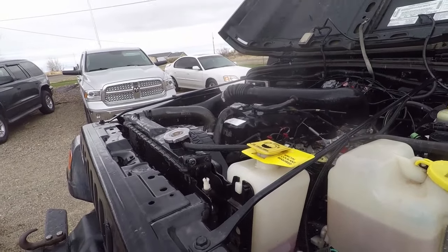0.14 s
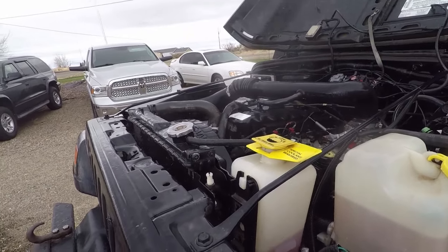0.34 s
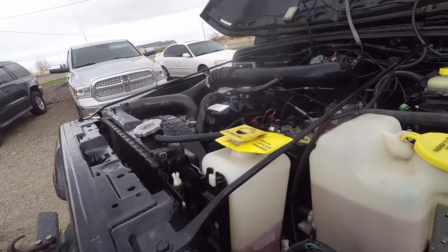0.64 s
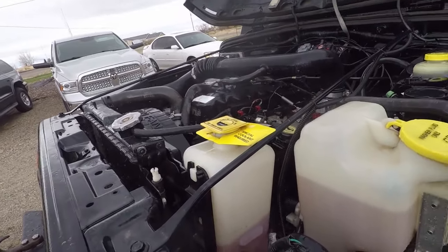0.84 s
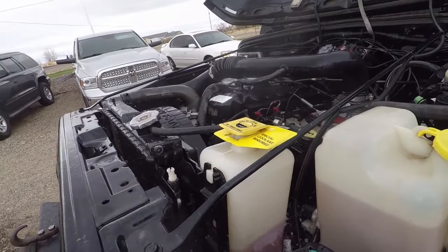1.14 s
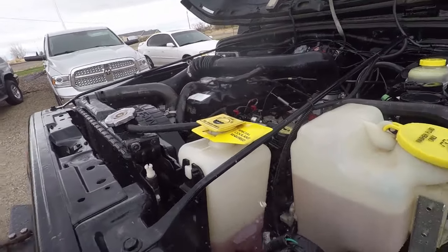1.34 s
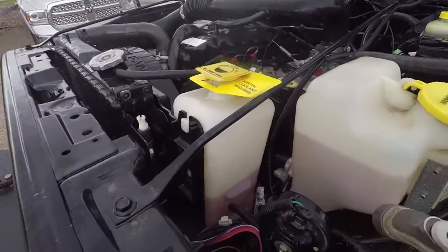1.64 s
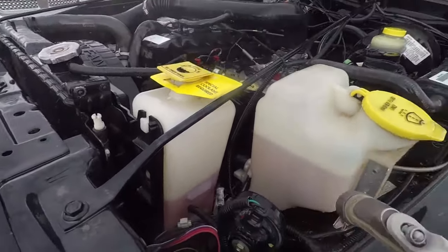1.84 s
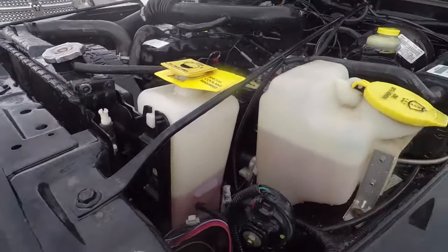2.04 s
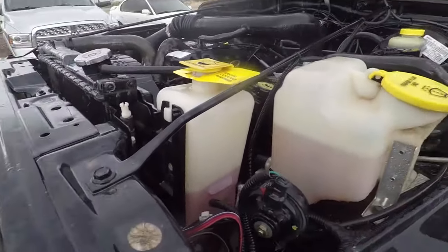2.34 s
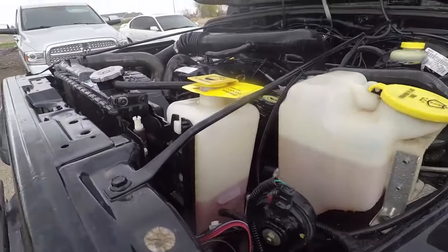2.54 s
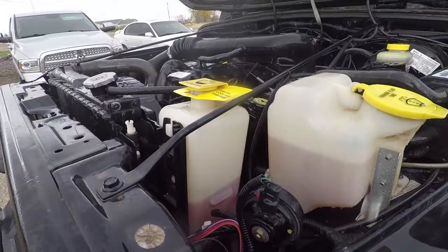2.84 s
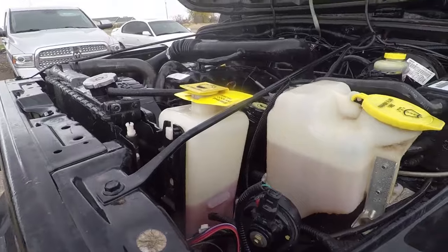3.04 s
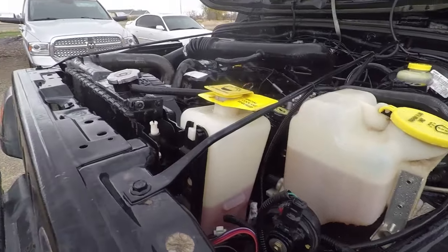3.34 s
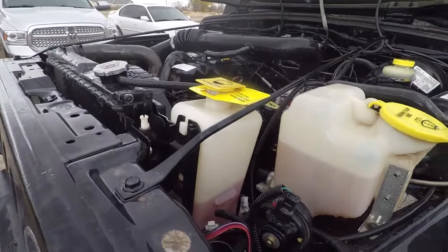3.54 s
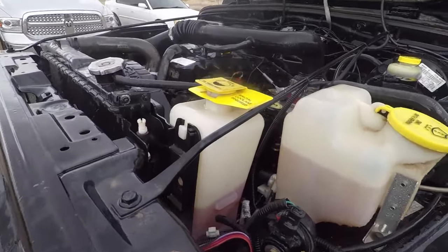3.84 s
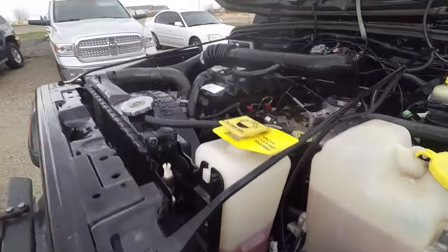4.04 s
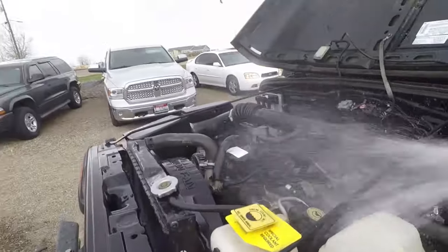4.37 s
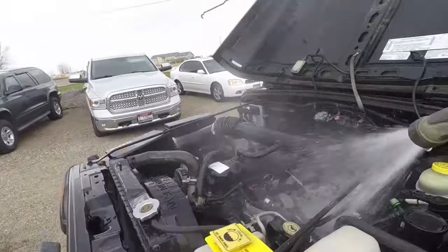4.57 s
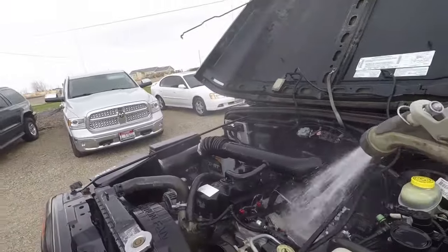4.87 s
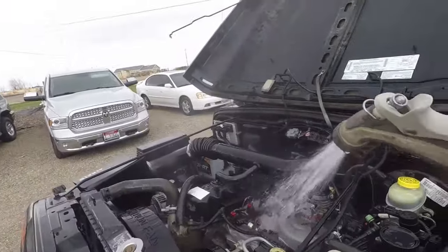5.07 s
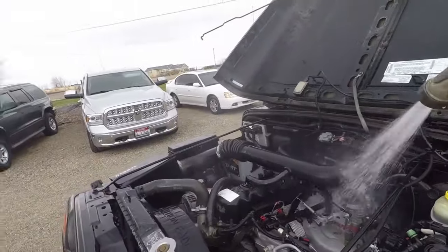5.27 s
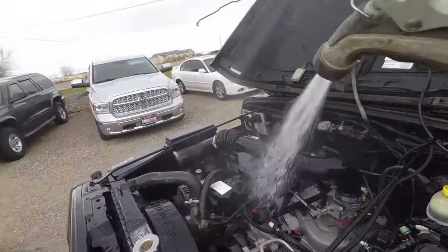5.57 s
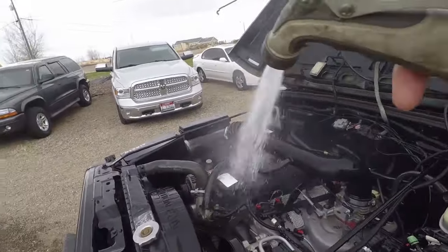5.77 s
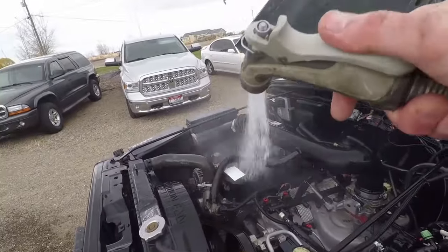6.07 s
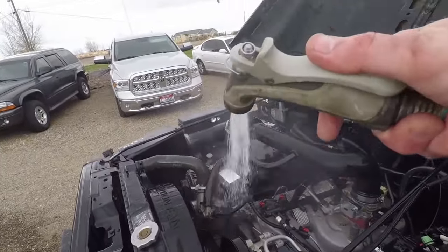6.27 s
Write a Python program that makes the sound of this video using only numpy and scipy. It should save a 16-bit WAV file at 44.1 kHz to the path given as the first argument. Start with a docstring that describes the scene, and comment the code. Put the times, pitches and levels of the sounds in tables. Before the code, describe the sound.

A hose jet hisses and drums inside an engine bay, snaps off to trickles, drips and wind thumps, then blasts back brighter and closer.

```python
"""A hose nozzle rinses an engine bay outdoors, is shut for nearly three seconds, then opens again close by.
The jet is noise and droplet impacts: it hisses, spatters, drums on panels and rings resonant hollows.
In the pause water trickles and drips off the engine, shaped noise bursts over a faint open-air background.
Wind rumbles, flutters and thumps in both microphone ports of a hand-held camera.
The stereo image soon narrows to mono, except for the sound above about 12 kHz."""
import sys
import numpy as np
from scipy import signal
from scipy.fft import rfft, irfft
from scipy.io import wavfile

SR = 44100
rng = np.random.default_rng(int(sys.argv[2]) if len(sys.argv) > 2 else 0)


def store_pcm(level_fs):
    """Save levels as 16-bit WAV."""
    pcm = np.round(np.clip(level_fs, -1, 1) * 32767).astype(np.int16)
    wavfile.write(sys.argv[1], SR, np.atleast_2d(pcm).T)


N = 282681
TIME = np.arange(N) / SR


def jet():
    """The valve lets both rinses through."""
    first, second = valve()
    return first * first_rinse() + second * second_rinse()


# the trigger is let go, later eased to a leak, then squeezed fully
SHUT_S, EASED_S, SQUEEZED_S = 1.313, 4.027, 4.086
CLOSING_S, OPENING_S, LEAK_SHARE = 0.0095, 0.002, 0.33  # time constants, largest leak


def valve():
    """Opening 0-1 for each rinse: the first snaps shut; the second leaks more and more, then opens fully."""
    first = 1 - rise(SHUT_S, CLOSING_S)
    leak = LEAK_SHARE * np.clip((TIME - EASED_S) / (SQUEEZED_S - EASED_S), 0, 1)
    second = leak + (1 - leak) * rise(SQUEEZED_S, OPENING_S)
    return first, second


# spray colour down behind the tanks, relative: pitch_hz, level_db (per Hz)
HIDDEN_HISS = [(250, -10), (600, -10), (1500, -13), (3000, -13.5), (4100, -15), (5300, -8), (7000, -5),
               (9400, -0.5), (10700, -2.5), (11800, -10), (13500, -12.5), (15300, -23.5)]
# loudness of the spray as the nozzle moves nearer or is shielded: time_s, level_db
HIDDEN_SPRAY = [(0, -23.5), (.16, -22), (.4, -25), (.95, -19), (1.06, -17.5), (1.17, -21.5), (1.3, -18.5)]
# the jet sweeps across a hollow behind the tanks:
# centre_s, half_length_s, level_db, hollow_pitch_hz, ring_db (over the panel)
HIDDEN_SWEEPS = [(0.33, 0.099, -31, 1586, -2), (0.378, .05, -39.5, 1325, 1), (0.489, 0.051, -32, 1530, 0.5),
                 (.58, 0.11, -30, 1640, -5), (1.082, .014, -34, 1610, 7), (1.122, 0.018, -32, 1666, 7),
                 (1.285, .037, -30.5, 1700, -10)]
HIDDEN_DRUM_DB, HIDDEN_HOLLOW_WIDTH_HZ = -31.5, 68


def first_rinse():
    """A smooth rinse deep in the bay, drumming harder at each panel and ringing the hollow behind it."""
    spray = hiss(HIDDEN_HISS, drop_rate=6000, spread_db=1.5, mist_db=-0.5, flutter_db=0.67)
    spray = undb(curves(HIDDEN_SPRAY)[0]) * spray
    steady = undb(HIDDEN_DRUM_DB) * rise(-0.14, 0.13)
    power = steady ** 2
    blows = impacts(2500, 1.5)
    hollows = np.zeros(N)
    for centre_s, half_s, db, hz, ring_db in HIDDEN_SWEEPS:
        power += swell(centre_s, half_s, db) ** 2
        ring = unit(resonate(blows, hz, HIDDEN_HOLLOW_WIDTH_HZ))
        hollows += swell(centre_s, half_s, db + ring_db) * ring
    drum = np.sqrt(power) * drumming(ring_db=7.5, flutter_db=1.64, bubble_db=-10)
    return spray + drum + hollows


# spray colour close by in the open, relative: pitch_hz, level_db (per Hz)
OPEN_HISS = [(250, -14.5), (600, -11.5), (1500, -16.5), (3400, -13.5), (4250, -10), (4650, -7), (7000, -3),
             (8100, 3), (10000, 2.5), (11700, -5), (13500, -9), (15300, -20.5)]
# loudness of the spray as the nozzle moves nearer or is shielded: time_s, level_db
OPEN_SPRAY = [(4.09, -19.5), (4.16, -22), (4.26, -18), (4.44, -28), (4.83, -28), (4.92, -23.5), (5.15, -25),
              (5.75, -25), (5.95, -23.5), (6.17, -25), (6.32, -19.5), (6.41, -27)]
# colour of the sizzle at the nozzle: pitch_hz, level_db (over the spray)
SIZZLE = [(3000, -5.5), (5000, -12), (6600, -0.5), (8500, -2), (11000, -7.5), (15000, 3)]
# resonances of the nozzle, heard until the water lands: pitch_hz, width_hz, level_db (over its sizzle)
NOZZLE_MODES = [(2550, 200, 2), (4900, 500, 2), (6040, 170, 5), (7200, 400, -1), (8250, 380, 4),
                (9400, 400, 3), (10550, 300, 6), (11900, 250, 5)]
# level of the low treble of the splash: time_s, level_db
SPLASH_LOW_TREBLE = [(4.12, 3), (4.25, 2.5), (4.45, 1), (4.9, 1), (5.06, 5.5), (5.3, -1), (5.5, 1.5),
                     (5.72, -0.5), (5.93, -1.5), (6.25, 0)]
# the jet sweeps across a hollow in the open:
# centre_s, half_length_s, level_db, hollow_pitch_hz, ring_db (over the panels)
OPEN_SWEEPS = [(4.15, 0.034, -24.5, 2110, 11), (4.231, 0.054, -25.5, 2030, 15),
               (4.293, 0.039, -25.5, 1990, 17), (4.371, 0.063, -27.5, 1580, -8),
               (4.702, 0.057, -37, 2130, 1), (4.956, 0.02, -36, 1600, -1), (5.0, 0.062, -27.5, 1300, -5),
               (5.065, .04, -25.5, 2480, 5), (5.135, 0.028, -31, 2480, 5), (5.191, 0.031, -28, 1670, 3),
               (5.447, 0.023, -23, 1620, -1), (5.527, 0.074, -27.5, 1680, -6),
               (6.251, 0.032, -32.5, 2430, 14)]
LOW_TREBLE_HZ, LOW_TREBLE_WIDTH_HZ, HOLLOW_WIDTH_HZ = 4080, 2600, 310
# the second jet needs a moment to reach the engine
FLIGHT_S, LANDING_S = 0.021, 0.033
# the drumming thins out as the jet is turned down onto the engine block
OPEN_DRUM_DB, DRUM_FADE_DB_PER_S = -34.5, -2.5


def second_rinse():
    """The nozzle sizzles and whistles, then the landing water hisses, drums and rings each hollow it sweeps."""
    landed = rise(SQUEEZED_S + FLIGHT_S, LANDING_S)
    spray = hiss(OPEN_HISS, drop_rate=3000, spread_db=3.0, mist_db=3.0, flutter_db=1.75)
    spray = spray * undb(curves(OPEN_SPRAY)[0] + 0.28 * walk(15))

    sizzle = colour(spray, SIZZLE)
    whistle = sum(undb(db) * resonate(sizzle, hz, width) for hz, width, db in NOZZLE_MODES)
    at_nozzle = sizzle + whistle

    extra_treble = undb(curves(SPLASH_LOW_TREBLE)[0]) - 1
    splash = spray + extra_treble * resonate(spray, LOW_TREBLE_HZ, LOW_TREBLE_WIDTH_HZ)

    block = drumming(ring_db=-10, flutter_db=1.0, bubble_db=-10.5)
    block = unit(block + 0.35 * resonate(block, 1660, 700))
    drum = undb(OPEN_DRUM_DB + DRUM_FADE_DB_PER_S * (TIME - SQUEEZED_S)) * block
    panels = covers()
    for centre_s, half_s, db, hz, ring_db in OPEN_SWEEPS:
        blows = np.roll(panels, rng.integers(N))  # other drops at each sweep
        ring = undb(ring_db) * resonate(blows, hz, HOLLOW_WIDTH_HZ)
        drum += swell(centre_s, half_s, db) * unit(blows + ring)
    return (1 - landed) * at_nozzle + landed * (splash + drum)


# as the jet wanders, narrow bands of the splash swell and fade on their own
SHIMMER_SHARE, SHIMMER_PER_S = 0.17, 26


def hiss(points, drop_rate, spread_db, mist_db, flutter_db):
    """Mist and droplets flutter together as the jet breaks into slugs; the splash keeps changing colour."""
    spray = impacts(drop_rate, spread_db) + undb(mist_db) * rng.standard_normal(N)
    spray = spray * undb(flutter_db * walk(420) + 0.45 * walk(55))
    shimmer = np.zeros(N)
    for hz in range(2800, 12000, 420):
        shimmer += walk(SHIMMER_PER_S) * resonate(spray, hz, 380)
    return unit(colour(spray + SHIMMER_SHARE * shimmer, points))


# panels under the jet, relative: pitch_hz, level_db (per Hz)
PANELS = [(150, -7.5), (400, -4.5), (650, 0.5), (850, -1.5), (1100, -2.5), (1700, -1), (2400, 1),
          (3000, -4), (4000, -13.5), (8000, -36)]
# hollows of the engine bay: pitch_hz, width_hz, level_db (over the panels, before ring_db)
BAY_MODES = [(751, 34, -8), (1010, 25, -11), (1150, 25, -15), (1325, 36, -7), (1618, 146, 0.5),
             (1825, 120, -6.5), (2470, 78, -8)]
# the hollows swell and fade on their own as the jet wanders
HOLLOW_SWING_DB, HOLLOW_SWING_PER_S = 3.5, 13


def drumming(ring_db, flutter_db, bubble_db):
    """Heavier drops beat on wet plastic and sheet metal and ring the hollows between them."""
    air = bubbles(70, 905, 2800, 10.0)
    blows = impacts(2500, 1.7) + rng.standard_normal(N) + undb(bubble_db) * air
    panels = colour(blows * undb(flutter_db * walk(170)), PANELS)
    ring = np.zeros(N)
    for hz, width, db in BAY_MODES:
        gain = undb(db + HOLLOW_SWING_DB * walk(HOLLOW_SWING_PER_S))
        ring += gain * resonate(panels, hz, width)
    return unit(panels + undb(ring_db) * ring)


# thin covers in the open give little below a kilohertz: pitch_hz, level_db
THIN_COVERS = [(300, -1.5), (820, -3.5), (1000, 5), (1750, 3), (2100, -1), (2550, 0.5), (2900, -2.5),
               (4000, 6)]
COVER_SPREAD_DB = 2.6  # scatter in the size of the drops


def covers():
    """Where the jet meets a cover, separate drops patter on it and trap small bubbles."""
    air = bubbles(160, 998, 2700, 9.8)
    blows = impacts(1500, COVER_SPREAD_DB) + 0.4 * rng.standard_normal(N) + undb(-11.5) * air
    return colour(colour(blows, PANELS), THIN_COVERS)


def bubbles(rate, low_hz, high_hz, cycles):
    """Trapped air rings for a few cycles, each bubble at the pitch of its size; about rate a second per pitch."""
    pitches = np.geomspace(low_hz, high_hz, 10)
    births = impacts(10 * rate, 2.1)
    kind = rng.integers(0, 10, N)
    return unit(sum(resonate(births * (kind == k), hz, hz / cycles) for k, hz in enumerate(pitches)))


# slugs of water that slap a panel: start_s, peak_db, pitch_hz
SLAPS = [(4.998, -16.5, 1300), (5.003, -11.5, 2490), (5.04, -14, 2300), (5.136, -18, 2310),
         (5.206, -19, 1600), (5.443, -15, 1540), (5.453, -18, 1700), (5.505, -13, 1680), (5.554, -22, 1320)]
SLAP_DECAY_S, SLAP_WIDTH_HZ = 0.0024, 900


def slaps():
    """A whole slug of water lands at once and cracks briefly on the cover."""
    out = np.zeros(N)
    for s, db, hz in SLAPS:
        crack = resonate(burst(SLAP_DECAY_S), hz, SLAP_WIDTH_HZ)
        add(out, s, colour(crack, PANELS), db)
    return out


# stray drops that hit the camera: start_s, peak_db
SPATTER = [(4.259, -7), (4.298, -9), (4.365, -9), (4.742, -12), (4.896, -10.5), (4.917, -11), (4.963, -9),
           (5.086, -9), (5.286, -9), (5.36, -13), (5.393, -8), (5.589, -12), (5.616, -9)]


def spatter():
    """Stray drops tick sharply on the camera and scatter into a little fizz."""
    out = np.zeros(N)
    for s, db in SPATTER:
        tick = burst(0.0002)
        fizz = 0.18 * burst(0.003)
        add(out, s, colour(tick + fizz, OPEN_HISS), db)
    return out


# water running off the engine: time_s, level_db
RUNOFF = [(1.35, -45), (1.5, -46), (1.85, -46.5), (1.98, -42.5), (2.3, -49), (2.6, -52), (2.95, -53.5),
          (3.3, -56.5), (3.7, -54), (4.02, -54)]
# colour of the run-off, relative: pitch_hz, level_db (per Hz)
RUNOFF_COLOUR = [(600, -6), (1500, -4.5), (2700, -5.5), (3900, -10), (5200, -4), (7000, -2.5), (9000, 2),
                 (10700, -1), (11800, -8), (13500, -13), (15000, -31)]
# soft rustles as the hose is moved: centre_s, half_length_s, level_db, pitch_hz, width_hz
RUSTLES = [(1.79, .054, -50.5, 900, 1200), (1.975, 0.077, -41, 550, 900), (2.058, .025, -40.5, 720, 300),
           (2.104, 0.027, -41.5, 800, 450), (2.182, 0.03, -45, 650, 500), (2.245, .035, -46.5, 850, 900),
           (2.803, 0.013, -48, 1500, 900), (3.507, .048, -51, 1100, 800), (3.572, .03, -44, 1080, 700),
           (3.963, 0.018, -43.5, 800, 350), (3.992, 0.021, -45.5, 1060, 400), (4.055, .014, -50, 1200, 500)]
# colour of the rubbing hose, relative: pitch_hz, level_db (per Hz)
RUSTLE_COLOUR = [(200, 14.5), (450, 6), (800, 3), (1250, -2), (1600, -8), (2500, -10), (5000, -28)]
RUNOFF_FLICKER_DB, PATTER_SHARE = 1.3, 0.52  # patter relative to the crackle


def pause():
    """With the valve shut, a fine crackle of run-off is left; noise bands swell as the hose rustles."""
    crackle = impacts(1800, 2.0) + 1.7 * rng.standard_normal(N) + 0.27 * bubbles(13, 1660, 9600, 15)
    crackle = unit(crackle * undb(RUNOFF_FLICKER_DB * walk(110))) + PATTER_SHARE * patter()
    runoff = undb(curves(RUNOFF)[0]) * unit(colour(crackle, RUNOFF_COLOUR))

    rubbing = colour(rng.standard_normal(N) * undb(2.4 * walk(97)), RUSTLE_COLOUR)
    rustle = np.zeros(N)
    for centre_s, half_s, db, hz, width in RUSTLES:
        rub = np.roll(rubbing, rng.integers(N))
        rustle += swell(centre_s, half_s, db) * unit(resonate(rub, hz, width))
    return (1 - sum(valve())) * runoff + rustle


PATTER_PER_S, PATTER_DECAY_S = 22, 0.004  # in each register


def patter():
    """Small drops splash here and there for a few milliseconds, each in its own register."""
    out = np.zeros(N)
    keep = np.exp(-1 / (PATTER_DECAY_S * SR))
    for hz in np.geomspace(2200, 12500, 7):
        splashes = signal.lfilter([1], [1, -keep], np.abs(impacts(PATTER_PER_S, 1)))
        out += splashes * resonate(rng.standard_normal(N), hz, hz / 3)
    return unit(out)


# drops falling off the engine: start_s, peak_db, pitch_hz, width (share of the pitch), decay_s
DRIPS = [(1.371, -33, 8200, .3, .005), (1.421, -37, 3070, .2, .002), (1.568, -29, 3400, 0.91, .004),
         (1.576, -32.5, 2670, .1, .005), (1.633, -35, 8600, .4, .005), (1.687, -39, 8300, .6, .003),
         (1.721, -35, 9900, .3, .004), (1.77, -26.5, 8600, 0.63, 0.0054), (1.841, -38, 9300, .3, .004),
         (1.976, -34, 3860, .27, .008), (2.258, -37, 5740, .028, .014), (2.302, -35, 9600, .2, .012),
         (2.39, -39, 1150, .25, .002), (2.41, -38, 3000, .7, .007), (2.482, -38, 7000, .32, .007),
         (2.541, -45, 1200, .25, .002), (2.592, -37, 7000, .15, .005), (2.612, -35, 10400, .25, .005),
         (2.669, -27, 8650, .35, .007), (2.743, -31.5, 7850, .35, .006), (2.812, -34, 5470, .47, .007),
         (3.236, -37, 8700, .3, .006), (3.318, -35, 7400, .37, .006), (3.601, -34.5, 1080, .23, .005),
         (3.665, -38, 8700, .23, .005)]


def drips():
    """Each falling drop is a short splash around its own pitch."""
    out = np.zeros(N)
    for s, db, hz, width, decay_s in DRIPS:
        splash = resonate(burst(decay_s), hz, width * hz)
        splash = resonate(splash, hz, 0.93 * hz)
        add(out, s, colour(splash, RUNOFF_COLOUR), db)
    return out


# knocks of the trigger and the handled camera:
# start_s, knock_peak_db, thud_peak_db, thud_pitch_hz, brightness_db (of the blow, treble), rattle_share
KNOCKS = [(1.218, -11.5, -34, 172, -9, 0.4), (1.360, -17.5, -38, 170, -4, 0.33),
          (2.8157, -18, -5, 42.7, 12, 0.047), (2.838, -29, -14, 40, 24, .1)]
# colour of blow and rattle: pitch_hz, level_db (per Hz)
KNOCK_COLOUR = [(100, 15), (350, 12.5), (700, 4), (1100, -11), (1900, -18), (2800, -42), (8000, -55)]
# a thud follows its knock and starts high, while the contact is stiff
THUD_LAG_S, THUD_STIFF_S, THUD_EXTRA_CYCLES, THUD_RING_S = 0.0021, 0.005, 0.23, 0.024


def knocks():
    """A short blow, a dull after-rattle and a few swings of a low thud that sags in pitch."""
    out, t = np.zeros(N), TIME[:SR // 5]
    for s, knock_db, thud_db, hz, bright_db, rattle in KNOCKS:
        click = 9 * (t == 0)  # a single sample
        blow = colour(click + 0.64 * burst(0.0023), [(400, 0), (1600, bright_db)])
        add(out, s, colour(blow + rattle * burst(0.021), KNOCK_COLOUR), knock_db)
        cycles = hz * t + THUD_EXTRA_CYCLES * (1 - np.exp(-t / THUD_STIFF_S))
        thud = np.sin(2 * np.pi * cycles) * np.exp(-(t / THUD_RING_S) ** 2)
        add(out, s + THUD_LAG_S, thud, thud_db)
    return out


# wind on the ports: time_s, rumble_db, flutter_db
WIND = [(0, -28.5, -20), (.55, -36, -27.5), (.62, -31, -30), (1.25, -30, -30), (1.4, -22.5, -39.5),
        (1.9, -26.5, -45), (2.15, -24.5, -33.5), (2.9, -27, -34), (4, -26.5, -36), (4.6, -28.5, -34.5),
        (5.2, -28.5, -38.5), (5.9, -34.5, -40.5), (6.41, -35, -42.5)]
# colour of the rumble, relative: pitch_hz, level_db (per Hz)
RUMBLE = [(12, -10), (25, 1), (42, 5), (60, -1), (90, -9), (200, -62.5)]
# colour of the flutter, relative: pitch_hz, level_db (per Hz)
FLUTTER = [(40, -9.5), (75, 1.5), (125, -1), (180, -11), (280, -17.5), (450, -31.5), (900, -63.5)]
# single eddies that strike the ports, each setting in half a swell early:
# time_s, peak_db, speed (relative), swell_s
EDDIES = [(.004, -14.5, 1.44, 0.0083), (.085, -19, 1.04, 0.0093), (.15, -18, 1.05, 0.01),
          (0.201, -16, 1.3, 0.0067), (0.488, -13.5, 0.52, 0.01), (.535, -13, 0.6, 0.0095),
          (2.182, -20.5, 0.57, 0.015), (2.258, -19, 1.04, .0085), (2.331, -22, 0.7, 0.0079),
          (2.416, -27, 1, 0.011), (2.569, -17, 0.99, .011), (2.664, -12, 1.08, .009),
          (2.72, -22, 1.17, 0.0052), (2.75, -17, 1.02, .0044), (2.895, -21, .8, 0.0052),
          (2.94, -15.5, 0.73, .012), (3.067, -13, 0.88, 0.011), (3.119, -19, 0.83, 0.0091),
          (3.21, -19.5, 0.62, 0.018), (3.263, -21, 0.66, 0.0086), (3.449, -14, 0.94, 0.014),
          (3.54, -19.5, 1.06, 0.0082), (3.61, -22.5, 1.42, 0.006), (3.757, -23, 0.98, .008),
          (3.803, -25.5, 1.02, .006), (3.836, -16.5, 1.1, 0.0096), (3.922, -24.5, 1.4, 0.0046),
          (4.087, -23.5, 1.46, 0.0089), (4.164, -16.5, 0.85, 0.0062), (4.28, -19, 0.79, 0.015),
          (4.57, -16, 0.63, 0.01), (4.67, -20.5, 0.75, 0.0088), (5.548, -15.5, .8, .01),
          (5.688, -14, .95, .009), (6.163, -11, .9, .016), (6.24, -19.5, .8, .02)]
# colour of an eddy at speed 1, relative: pitch_hz, level_db (per Hz)
EDDY_COLOUR = [(30, -15.5), (80, -1.5), (135, 3.5), (200, -3.5), (300, -14.5), (450, -29), (700, -50),
               (2000, -77)]


def wind():
    """Deep rumble, a faster flutter, and single eddies that swell and thump; faster eddies sound higher."""
    rumble_db, flutter_db = curves(WIND)
    out = undb(rumble_db) * unit(colour(rng.standard_normal(N), RUMBLE))
    gusts = rng.standard_normal(N) * undb(1.87 * walk(35))
    out += undb(flutter_db) * unit(colour(gusts, FLUTTER))
    for s, db, speed, swell_s in EDDIES:
        swirl = burst(swell_s) * TIME[:SR // 5]
        add(out, s - swell_s / 2, colour(swirl, np.array(EDDY_COLOUR) * [speed, 1]), db)
    return out


# colour of the open air, relative: pitch_hz, level_db (per Hz)
OUTDOORS = [(100, 1.5), (400, -9.5), (1000, -12.5), (2000, -21.5), (5000, -53), (12000, -40)]


def outdoors():
    """Faint open-air background: dull noise whose level drifts slowly."""
    return undb(-53.0 + walk(2.12)) * unit(colour(rng.standard_normal(N), OUTDOORS))


def undb(db):
    """Decibels to gain."""
    return 10 ** (np.asarray(db) / 20)


def unit(x):
    """Scale to rms 1."""
    return x / np.sqrt(np.mean(x ** 2))


def curves(table):
    """Each column of a table as a line through time."""
    s, *columns = np.transpose(table)
    return [np.interp(TIME, s, c) for c in columns]


def walk(rate):
    """Smooth chance with spread 1 that changes about rate times a second."""
    knots = rng.standard_normal(N // 16)
    return unit(np.interp(TIME * rate, np.arange(len(knots)), knots))


def rise(s, lag_s):
    """From 0 at time s towards 1, with the given time constant."""
    return 1 - np.exp(-np.maximum(TIME - s, 0) / lag_s)


def swell(s, half_s, db):
    """A bell-shaped gain centred on time s."""
    return undb(db) * np.exp(-((TIME - s) / half_s) ** 2)


def colour(x, points):
    """Causal filter from (Hz, dB) points, by way of the cepstrum."""
    size = 8192
    hz, db = np.transpose(points)
    f = np.maximum(np.fft.rfftfreq(size, 1 / SR), 1)
    gain = undb(np.interp(np.log(f), np.log(hz), db))
    cepstrum = irfft(np.log(gain))
    cepstrum[1:size // 2] *= 2  # fold onto positive time: minimum phase
    cepstrum[size // 2 + 1:] = 0
    response = irfft(np.exp(rfft(cepstrum)))
    return signal.fftconvolve(x, response)[:len(x)]


def resonate(x, hz, width):
    """One resonance, gain 1 at its centre."""
    hz = min(hz, 0.45 * SR)
    b, a = signal.iirpeak(hz, hz / min(width, SR / 4), fs=SR)
    return signal.lfilter(b, a, x)


def impacts(rate, spread_db):
    """Random droplet impacts, many small and a few large; rms 1."""
    out = np.zeros(N)
    hit = np.flatnonzero(rng.random(N) < rate / SR)
    size, sign = rng.random((2, N))[:, hit]
    size_db = spread_db * np.minimum(-np.log(1 - size), 5)
    out[hit] = undb(size_db) * np.sign(sign - 0.5)
    return unit(out)


def burst(decay_s):
    """A fifth of a second of noise that dies away."""
    t = TIME[:SR // 5]
    return rng.standard_normal(len(t)) * np.exp(-t / decay_s)


def add(out, s, sound, db):
    """Mix in a sound at time s with the given peak level."""
    i = max(int(s * SR), 0)
    out[i:i + len(sound)] += (undb(db) * sound / np.abs(sound).max())[:N - i]


def scatter(x):
    """The same sound smeared by many small reflections."""
    tail = burst(0.0076)
    return signal.fftconvolve(x, tail / np.sqrt(np.sum(tail ** 2)))[:N]


# stereo image of the two ports: time_s, width (0-1)
WIDTH = [(0, 1), (.55, 0.97), (.78, 0.41), (1.05, 0.16), (1.4, 0.07), (1.9, 0)]
# the left port resonates and is turned against the right one
PORT_HZ, PORT_WIDTH_HZ, PORT_DB, PORT_SCATTER_DB = 2170, 1800, 2, -4
# above about 12 kHz the sound stays wide and leans right
TOP_BAND_HZ, TOP_BAND_LEAN, TOP_BAND_SPREAD = 12200, 0.41, 0.48


def scene():
    """The left port faces the wind and hears muffled, scattered water; the sides merge, middle register last."""
    water = jet() + slaps() + spatter() + pause() + drips() + knocks() + outdoors()
    buffet = wind()

    port = colour(resonate(water, PORT_HZ, PORT_WIDTH_HZ), [(2500, 0.5), (4000, -7.5), (8000, -8.5)])
    muffling = [(300, 5), (1000, 2.5), (2200, -5), (4000, 0.5), (8000, -23), (15000, -21)]
    scattered = undb(PORT_SCATTER_DB) * colour(scatter(water), muffling)
    left = -undb(PORT_DB) * port + scattered + undb(7.5) * buffet

    right_colour = [(400, 2.6), (750, 5.9), (1100, 8.9), (1750, 7.7),
                    (2300, 3), (3000, 0.46), (4500, 1.7), (8000, 2.6)]
    right = colour(water, right_colour) + undb(-5.5) * wind()

    apart = np.array([left, right]) - water - buffet  # what each port adds to the mono sum
    middle_band = signal.butter(2, [400, 3000], "band", fs=SR, output="sos")
    middle = signal.sosfiltfilt(middle_band, apart)
    width = np.clip(curves(WIDTH)[0], 0, 1)
    image = width * middle + width ** 2 * (apart - middle)

    highpass = signal.butter(12, TOP_BAND_HZ, "high", fs=SR, output="sos")
    top_band = signal.sosfiltfilt(highpass, water)
    side = TOP_BAND_LEAN * top_band + TOP_BAND_SPREAD * scatter(top_band)
    return water + buffet + np.array([-side, side]) + image


TOP_HZ = 15200


def record(dry):
    """The camera cuts the top steeply."""
    return signal.sosfilt(signal.ellip(10, 0.2, 80, TOP_HZ, fs=SR, output="sos"), dry)


dry = scene()
out = record(dry)
store_pcm(out)
```